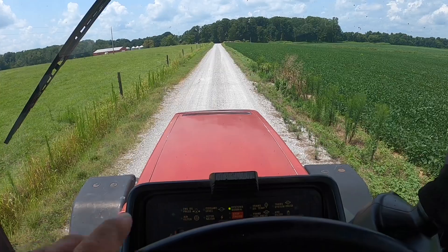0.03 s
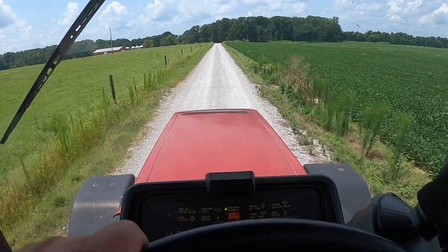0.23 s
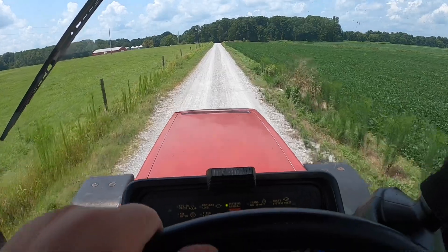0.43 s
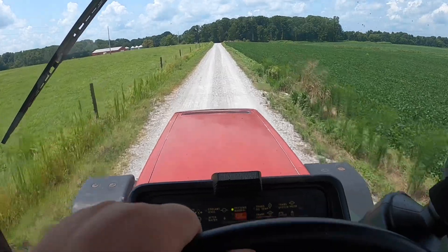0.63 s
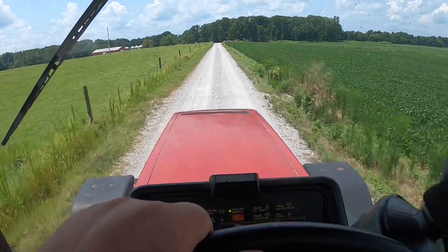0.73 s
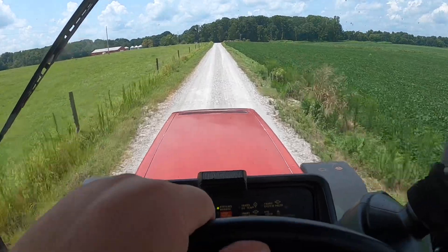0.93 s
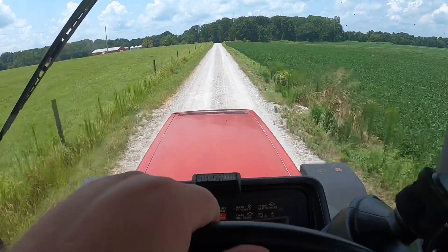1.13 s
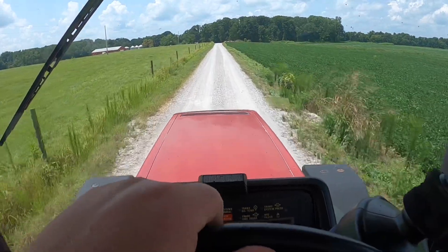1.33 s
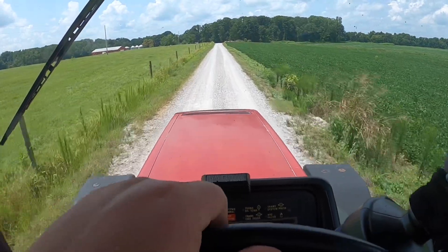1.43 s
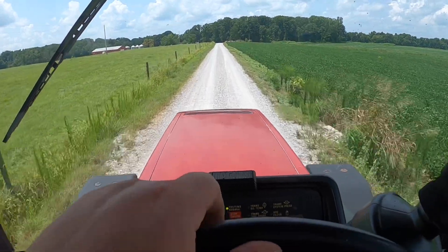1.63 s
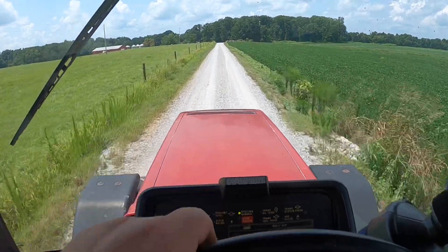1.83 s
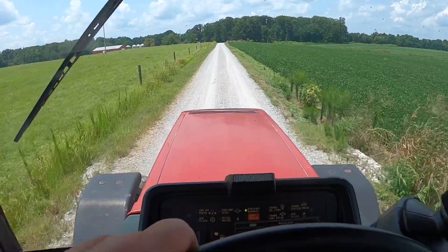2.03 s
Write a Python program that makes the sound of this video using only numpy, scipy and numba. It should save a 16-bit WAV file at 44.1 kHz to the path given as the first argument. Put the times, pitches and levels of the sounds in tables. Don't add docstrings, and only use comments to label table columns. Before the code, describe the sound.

A tractor's diesel engine drones inside its cab. Silence until about 0.2 s, then a quick fade-in to a deep, almost pure boom at constant pitch, held to the end around 2 s. Far quieter above it are pump and gear whine, blurred knock and fan rush, fullest near 0.5 s with gravelly brightness, then easing and duller. Big tyres rumble unevenly underneath. Close, enclosed, muffled treble.

```python
import sys
import numpy as np
from scipy import signal
from scipy.io import wavfile
from scipy.ndimage import uniform_filter1d
from numba import njit

SR = 44100
rng = np.random.default_rng(int(sys.argv[2]) if len(sys.argv) > 2 else 0)


def gain_from_db(level_db):
    decades = np.asarray(level_db, float) / 20
    return 10 ** decades


def to_wav(s):
    ch = np.atleast_2d(s).T
    pcm = np.round(np.clip(ch, -1, 1) * 32767)
    wavfile.write(sys.argv[1], SR, pcm.astype(np.int16))


N = 91463
TIME_S = np.arange(N) / SR
CYLINDERS = 6


def level(x, db):
    return x * gain_from_db(db) / np.sqrt(np.mean(x ** 2))


@njit
def resonator(x, hz, width):
    y = np.empty(len(x))
    band_state, low_state = 0., 0.
    g, damping = np.tan(np.pi * hz / SR), width / hz
    for i in range(len(x)):
        v = (band_state + g * (x[i] - low_state)) / (1 + g * (g + damping))
        band_state = 2 * v - band_state
        low_state = low_state + 2 * g * v
        y[i] = damping * v
    return y


def band(x, hz, width):
    hz, width = float(hz), float(width)
    return resonator(resonator(x, hz, width), hz, width)


def walk(rate_hz):
    hold = int(SR / rate_hz)
    steps = np.repeat(rng.standard_normal(N // hold + 1), hold)
    drift = uniform_filter1d(uniform_filter1d(steps, hold), hold)[:N]
    return (drift - drift.mean()) / drift.std()


def tone(turns, db):
    return np.sqrt(2) * gain_from_db(db) * np.cos(2 * np.pi * turns)


def tyres():
    bounce = band(rng.standard_normal(N), 26.4, 18)
    swell = np.sqrt(uniform_filter1d(bounce ** 2, int(.09 * SR)))
    rumble = level(bounce / (swell + 0.27 * bounce.std()), -25.5)
    shake = level(band(rng.standard_normal(N), 78.5, 190), -43)
    return rumble + shake


def gravel(hz):
    centre_hz, spread_octaves, fade_s, boost_db = 3500, 0.88, .5, 4
    share = np.exp(-(np.log2(hz / centre_hz) / spread_octaves) ** 2)
    patch = np.exp(-(TIME_S / fade_s) ** 2) - 0.25
    return gain_from_db(boost_db * share * patch)


CYLINDER_KNOCK = [0, -1.5, -.8, -2, -.4, -1.5]


def knock(firings, hz):
    firing = np.floor(firings).astype(int) + 1
    scatter_db = 1.5 * rng.standard_normal(N // 100)
    strength = gain_from_db(np.array(CYLINDER_KNOCK)[firing % CYLINDERS] + scatter_db[firing])
    depth = .45 / (1 + (hz / 1800) ** 2)
    burst = strength * np.exp(-(firings % 1) / .35)
    return (1 - depth + depth * burst) * rng.standard_normal(N)


# (frequency [Hz], level per hertz [dB])
RUSH_TILT = [(140, 1.5), (230, -10), (420, -2), (880, -15.5), (1800, -16), (4000, -33.5), (7000, -45),
             (13500, -57)]


def rush(firings):
    out, swell_db = 0, 0.65 * walk(1.8)
    tilt_hz, tilt_db = np.array(RUSH_TILT).T
    for k in range(21):
        hz = 140 * 2 ** (k / 3)
        db = np.interp(np.log(hz), np.log(tilt_hz), tilt_db) + 10 * np.log10(hz)
        noise = level(band(knock(firings, hz), hz, hz / 3), db)
        flicker_db = 1.05 * walk(11)
        out = out + noise * gravel(hz) * gain_from_db(swell_db + flicker_db)
    return level(out, -31.5)


# (frequency [Hz], width [Hz], level [dB])
PANEL_MODES = [(267.5, 22, -39), (340.3, 120, -38.5), (591, 83, -43.5), (669.4, 35, -44.5),
               (812.6, 35, -43), (967, 27, -48.5), (1183, 200, -46.5), (1343, 190, -46.5),
               (2046, 88, -54.5), (2376, 300, -50.5), (3210, 190, -57.5), (3610, 250, -63), (4510, 94, -72),
               (6620, 300, -75)]


def panels(firings):
    out = 0
    for hz, width_hz, db in PANEL_MODES:
        ring = level(band(knock(firings, hz), hz, width_hz), db)
        out = out + ring * gravel(hz) * gain_from_db(1.2 * walk(6))
    return out


WHINE_PITCH = [275.8, 408, 551.4, 827, 956, 1103, 1222, 1285, 1588, 2043, 2136, 3170, 3267, 3622, 4970,
               6370]
# (level [dB], unsteadiness [dB])
WHINE_LEVEL = [(-37, 3.5), (-45.5, 2.5), (-46, 3), (-49, 0.5), (-49.5, 4), (-54, 5.5), (-53.5, 1),
               (-44.5, -1.5), (-52.5, 2), (-50.5, 3), (-57, 4.5), (-63, -2.5), (-59, 1), (-69.5, 1),
               (-79.5, 2.5), (-83, 1.5)]


def whines():
    out = 0
    for hz, (db, waver_db) in zip(WHINE_PITCH, WHINE_LEVEL):
        turns = np.cumsum(hz * (1 + .0015 * walk(14))) / SR + rng.random()
        out = out + tone(turns, db + waver_db * walk(11))
    return out


# (multiple of the engine cycle [ratio], level [dB])
CRANK_ORDERS = [(8, -38.5), (9, -41.5), (10, -43.5), (12, -38), (14, -44.5), (18, -49), (20, -46),
                (22, -51), (24, -51), (31, -46.5), (32, -54), (36, -39), (38, -50), (39, -50.5),
                (56, -54.5), (72, -54.5), (74.9, -58), (81, -57.5), (49, -49.5), (175, -65)]


def crank(firings, load):
    out = 0
    for order, db in CRANK_ORDERS:
        turns = firings * round(order) / CYLINDERS + rng.random()
        line = tone(turns, db + 1.8 * walk(8.2))
        out = out + line * (load if order > 12.5 else 1)
    return out


def boom(firings):
    rise_db = 0.83 * (TIME_S - 1)
    return tone(firings, -15 + rise_db + 0.27 * walk(12))


def count_firings():
    firing_hz, first_peak_s = 113.36, .0054
    return np.cumsum(firing_hz * (1 + 0.00053 * walk(6))) / SR - firing_hz * first_peak_s


# (time [s], level [dB])
LOAD_CURVE = [
    (.2, -1),
    (.3, 2),
    (.55, 3),
    (.8, 1.5),
    (1.05, -0.5),
    (1.4, -2),
    (1.75, -2.5),
    (2.07, -3),
]


def scene():
    firings = count_firings()
    load = gain_from_db(np.interp(TIME_S, *np.array(LOAD_CURVE).T))
    padding = signal.butter(3, 9700, fs=SR, output="sos")
    padded = signal.sosfilt(padding, rush(firings) + panels(firings) + whines())
    return (tyres() + load * padded + crank(firings, load) + boom(firings))[None]


def roll_off(x):
    return signal.sosfilt(signal.butter(12, 15700, fs=SR, output="sos"), x)


def record(dry):
    fade_start_s, fade_s = 0.19, 0.078
    fade = np.clip((TIME_S - fade_start_s) / fade_s, 0, 1) ** 1.73
    return roll_off(np.tanh(dry) * fade)


dry = scene()
out = record(dry)
to_wav(out)
```